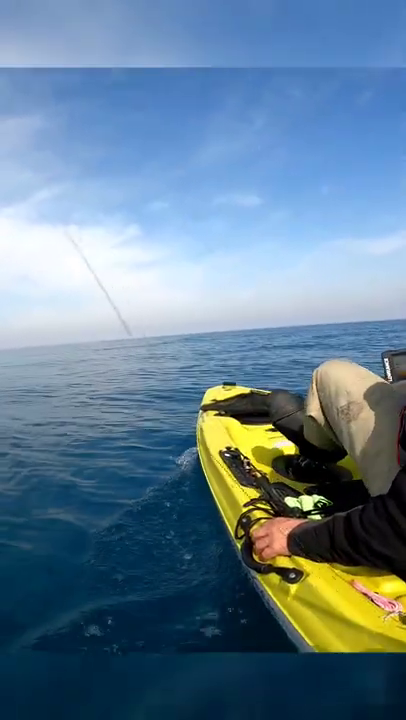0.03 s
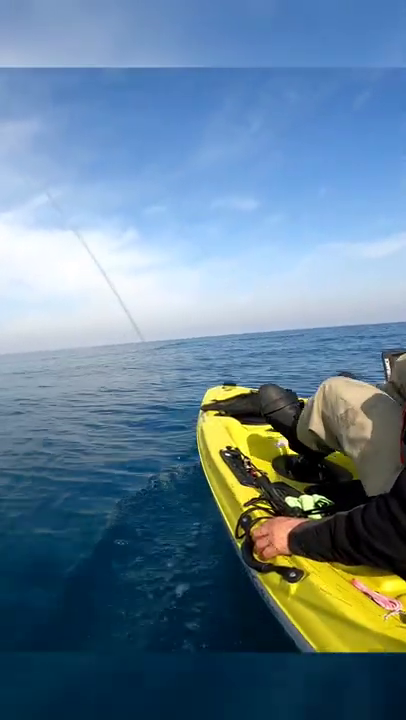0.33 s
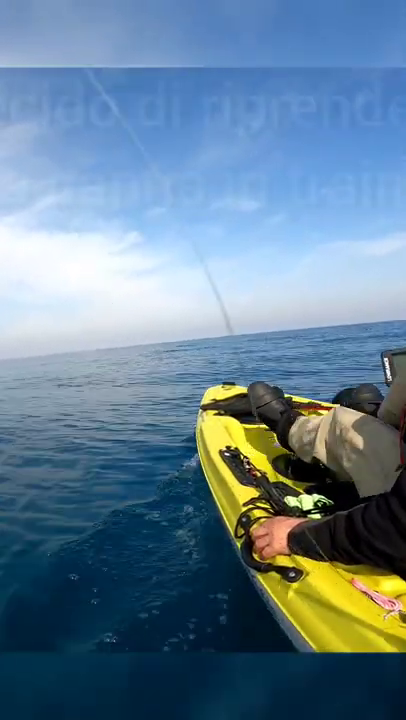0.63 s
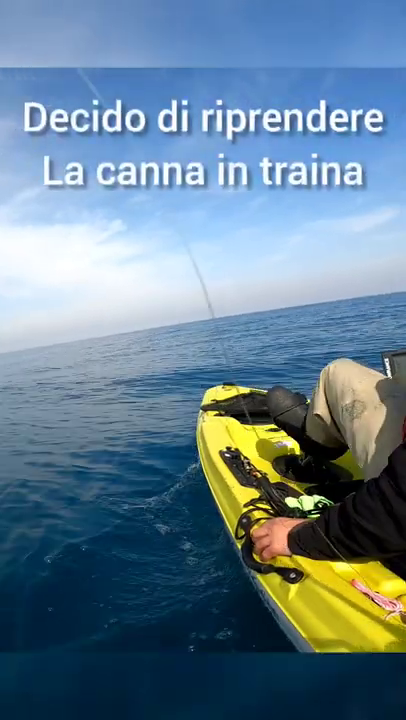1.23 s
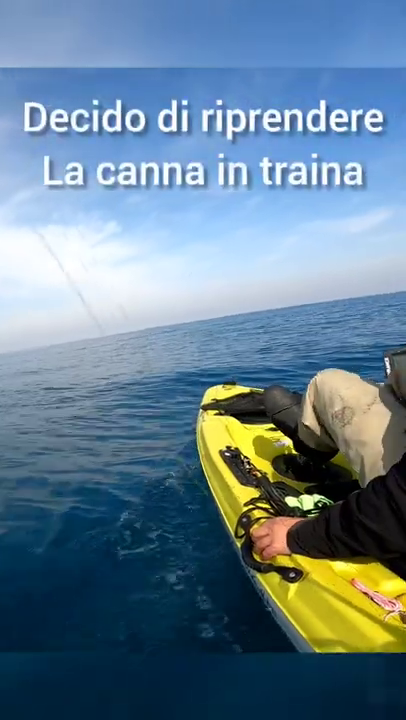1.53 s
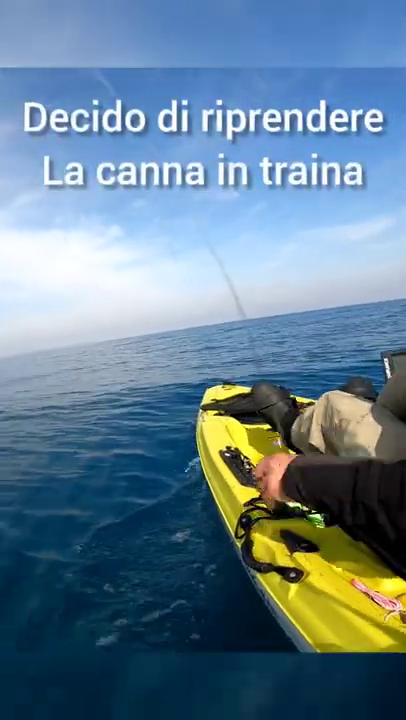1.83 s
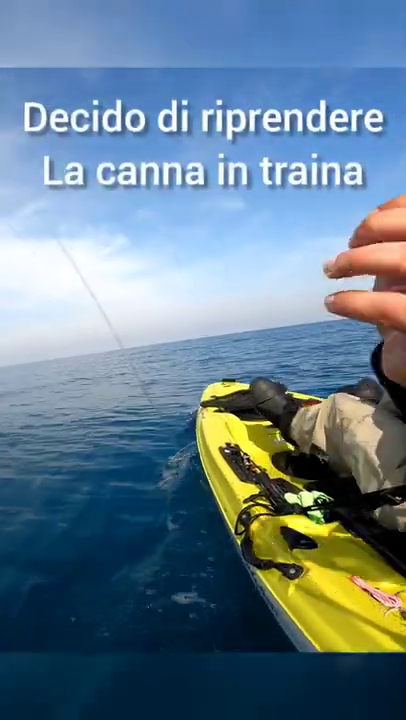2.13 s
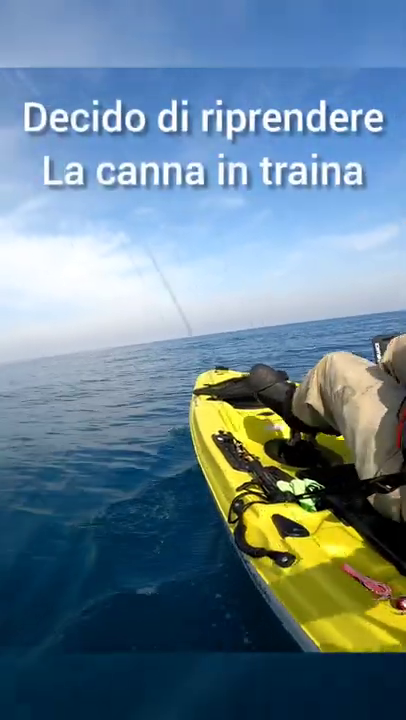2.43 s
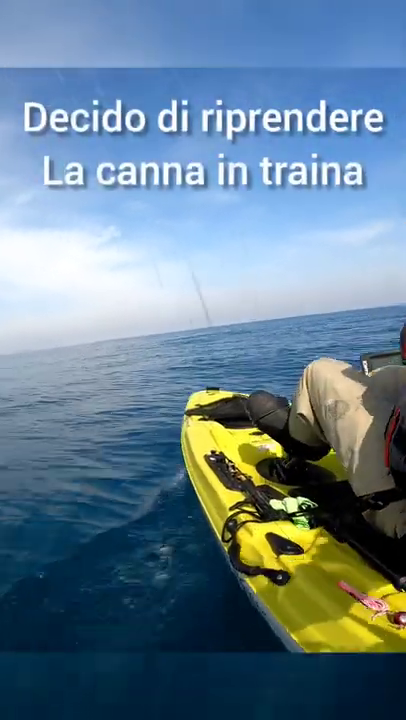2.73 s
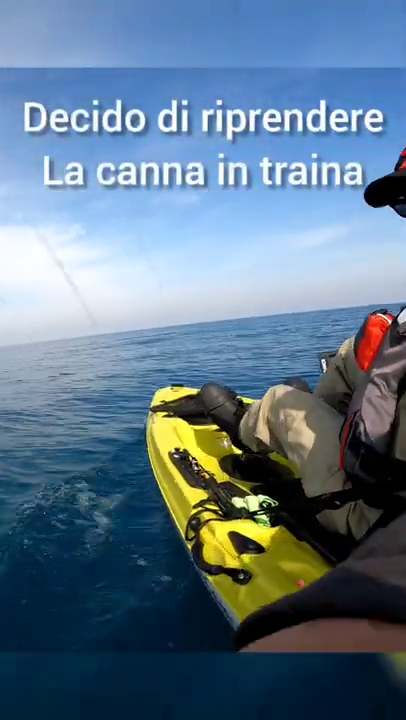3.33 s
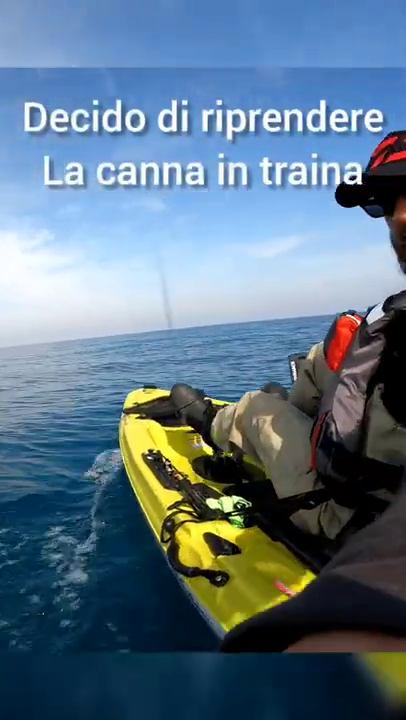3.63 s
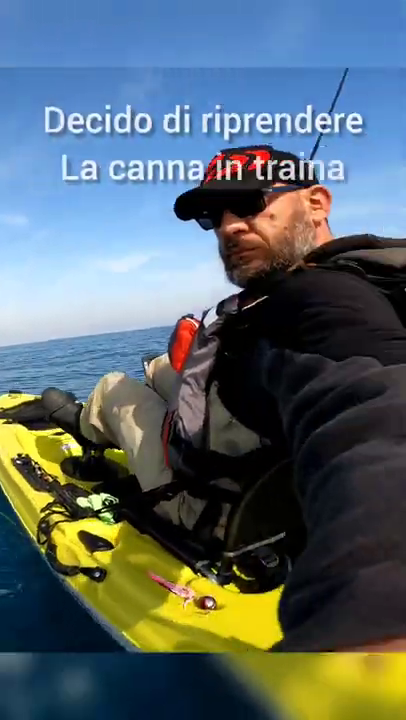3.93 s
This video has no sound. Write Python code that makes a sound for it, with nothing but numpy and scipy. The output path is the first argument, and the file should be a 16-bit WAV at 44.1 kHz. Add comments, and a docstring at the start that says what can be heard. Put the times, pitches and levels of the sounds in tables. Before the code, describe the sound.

Small waves slap and thump a hollow plastic kayak hull while wind rumbles on the microphone.

```python
"""On board a plastic kayak in a low swell. Wavelets slap and thump the hollow hull, trapped air plops and
gurgles, and droplets tick on the deck. Water washes along the side, crests fold into froth, and the bow
wave breaks into clouds of small bubbles and one hiss of spray. Gusts rumble on the microphone over the
faint hiss of the open sea."""
import sys
import numpy as np
from scipy import signal
from scipy.fft import rfft, irfft
from scipy.io import wavfile
from scipy.ndimage import uniform_filter1d

SR = 44100
rng = np.random.default_rng(int(sys.argv[2]) if len(sys.argv) > 2 else 0)


def store_pcm(level_fs):
    """Save levels as 16-bit WAV."""
    pcm = np.round(np.clip(level_fs, -1, 1) * 32767).astype(np.int16)
    wavfile.write(sys.argv[1], SR, np.atleast_2d(pcm).T)


N = 176400

TOP_HZ = 15300
FLICKER_DB = 3.5  # noise in wash and fizz
FROTH_GLIDE, FROTH_SPREAD_DB = 0.43, 6  # bubbles in wash and laps


def undb(db):
    """Decibels to gain."""
    return 10 ** (np.asarray(db) / 20)


def unit(x):
    """Scale to rms 1."""
    return x / np.sqrt(np.mean(x ** 2) + 1e-20)


def seconds(length_s):
    """Time axis."""
    return np.arange(max(int(length_s * SR), 8)) / SR


def fade(t, t60_s):
    """Exponential decay."""
    return np.exp(-np.log(1000) * t / t60_s)


def add(out, start_s, x):
    """Mix x in at start_s."""
    i = int(np.clip(start_s * SR, 0, N - 1))
    out[i:i + len(x)] += x[:N - i]


def curve(rows):
    """Gain through (time [s], level [dB]) points."""
    return undb(np.interp(np.arange(N) / SR, *np.array(rows).T))


def colour(x, points):
    """Filter by (frequency [Hz], gain [dB]) points; rolls off beyond both ends."""
    hz, db = np.array(points).T
    f = np.maximum(np.fft.rfftfreq(len(x), 1 / SR), 1)
    rolloff = np.minimum(np.minimum(f / hz[0], hz[-1] / f), 1) ** 2
    return irfft(rfft(x) * undb(np.interp(np.log(f), np.log(hz), db)) * rolloff, len(x))


def noise(points):
    """Coloured noise, rms 1."""
    return unit(colour(rng.standard_normal(N), points))


def walk(rate_hz):
    """Smooth random motion, rms 1."""
    f = np.fft.rfftfreq(N, 1 / SR)
    return unit(irfft(rfft(rng.standard_normal(N)) / (1 + (f / rate_hz) ** 2) ** 2, N))


def steady(x, span_s):
    """Divide by the running rms to even out slow swells."""
    return x / np.sqrt(np.abs(uniform_filter1d(x ** 2, int(span_s * SR))) + 1e-12)


def bubble(hz, t60_s, glide, wobble=0):
    """Sine that swells at pinch-off, then decays; glide is the relative pitch change per t60."""
    t = seconds(1.2 * t60_s)
    pitch_hz = hz * (1 + glide * t / t60_s + np.resize(wobble, len(t)))
    attack = (1 - np.exp(-t / (0.031 * t60_s))) ** 2
    return np.sin(2 * np.pi * np.cumsum(pitch_hz) / SR) * fade(t, t60_s) * attack


def cloud(per_s, low_hz, high_hz, cycles, glide, spread_db, cap_one_in, slope=1):
    """Bubbles of random size, strength and damping; slope favours the high ones."""
    out = np.zeros(N)
    draws = rng.random((12000, 5))
    for when, pitch, strength, sustain, rise in draws[:int(per_s * N / SR)]:
        hz = min(low_hz * (high_hz / low_hz) ** pitch, TOP_HZ)
        strength_db = spread_db * min(-np.log(1 - strength), np.log(cap_one_in))
        gain = undb(strength_db) * (hz / high_hz) ** slope
        t60_s = cycles * np.exp(2 * sustain - 1) / hz
        add(out, when * N / SR, gain * bubble(hz, t60_s, 2 * glide * rise))
    return out


def sea():
    """Steady hiss of open water."""
    # hiss spectrum (frequency [Hz], gain [dB])
    spectrum = [(1500,-13.5),(4000,-3),(8000,-5.5),(10500,-13),(12300,-17.5),(15000,-22)]
    return undb(-70.5) * noise(spectrum)


def wind():
    """Low turbulence on the microphone; strong gusts reach higher in pitch."""
    # gust strength (time [s], level [dB])
    gusts = [(0.0, -28.5), (0.11, -37), (.49, -35), (.56, -27.5), (.72, -36), (0.91, -31.5), (0.99, -45.5),
             (1.11, -31.5), (1.21, -46), (1.36, -42.5), (1.73, -51.5), (1.84, -41), (1.92, -27.5),
             (2.07, -34.5), (2.16, -26.5), (2.38, -41), (2.6, -31.5), (2.72, -52.5), (2.88, -31.5),
             (3.12, -46.5), (3.51, -23.5), (3.59, -36), (3.7, -24.5), (3.78, -31.5), (3.84, -22.5),
             (4.0, -39)]
    # turbulence spectrum (frequency [Hz], gain [dB])
    spectrum = [(15,-5),(28,4),(45,2),(68,1.5),(100,0),(160,-8),(250,-19),(400,-37),(900,-91)]
    split_hz, strong_db, flutter_db = 63, -36, 2
    air = steady(noise(spectrum), span_s=0.083)
    gust = curve(gusts)
    deep = signal.sosfiltfilt(signal.butter(2, split_hz, fs=SR, output="sos"), air)
    brightness = np.minimum(gust / undb(strong_db), 1) ** 0.24
    return (deep + brightness * (air - deep)) * gust * undb(-0.5 + flutter_db * walk(8.7))


def wash():
    """Larger bubbles churn along the hull over flickering noise."""
    # wash envelope (time [s], level [dB])
    levels = [(0.0, -48.5), (0.05, -51), (0.34, -45.5), (0.47, -50), (1.64, -45), (1.89, -52.5),
              (2.26, -45), (2.7, -56), (2.81, -37.5), (2.88, -51.5), (3.09, -40), (3.55, -51), (3.8, -48.5),
              (3.82, -39), (4.0, -44)]
    # wash spectrum (frequency [Hz], gain [dB])
    spectrum = [(120,9.5),(250,4.5),(450,4),(800,1.5),(1300,0.5),(1900,-5.5),(2800,-15.5),(5000,-20)]
    bubbles = cloud(per_s=700, low_hz=283.6, high_hz=2522, cycles=19.7,
                    glide=FROTH_GLIDE, spread_db=FROTH_SPREAD_DB, cap_one_in=34)
    bubbles = steady(colour(bubbles, spectrum), span_s=0.035)
    rush = undb(-4.5 + FLICKER_DB * walk(52)) * noise(spectrum)
    return curve(levels) * (undb(-5) * bubbles + rush)


def fizz():
    """Tiny bubbles burst in the bow wave over a soft hiss."""
    # fizz envelope (time [s], level [dB])
    levels = [(0.0, -55.5), (0.04, -60.5), (0.34, -49.5), (0.4, -61), (0.85, -58), (0.92, -46.5),
              (0.96, -55), (1.2, -49), (1.22, -54.5), (1.4, -54), (1.55, -58), (1.79, -62), (2.0, -63),
              (2.04, -52.5), (2.27, -51.5), (2.34, -55.5), (2.77, -57.5), (2.8, -48), (2.87, -58.5),
              (3.09, -41), (3.12, -46.5), (3.48, -62), (3.85, -48), (4.0, -49.5)]
    # fizz spectrum (frequency [Hz], gain [dB])
    spectrum = [(700,8.5),(1500,4),(2200,3.5),(3800,1.5),(5000,-4),(6300,-12.5),(8000,-16),(10500,-35.5),(12500,-22.5),(15500,-52)]
    bubbles = cloud(per_s=2200, low_hz=1525, high_hz=14560, cycles=14.7,
                    glide=0.032, spread_db=4.2, cap_one_in=39)
    bubbles = steady(colour(bubbles, spectrum), span_s=1.0)
    hiss = undb(-2 + FLICKER_DB * walk(66)) * noise(spectrum)
    return curve(levels) * (undb(-1) * bubbles + hiss)


def plops():
    """Loud single bubbles; the pitch wobbles as they change shape."""
    # air pockets closing (time [s], peak [dB], pitch [Hz], t60 [s], glide [share of pitch per t60])
    pockets = [(.023,-38.5,1380,0.022,0.065),(.268,-39,810,0.04,0.19),(.393,-32.5,630,0.024,0.21),(.595,-31,637,0.022,0.091),
               (.691,-35,1047,0.052,-0.027),(1.043,-27.5,2270,0.02,0.017),(1.042,-38,734,0.045,0.54),
               (1.173,-36.5,868,0.071,0.02),(1.228,-34.5,913,0.047,0.14),(1.545,-40,1650,0.034,0.4),(1.588,-35,442,0.11,0.25),
               (1.669,-38,917,0.045,0.27),(1.673,-40,1640,0.028,0.045),(2.066,-44.5,2330,0.044,-0.11),(2.192,-36,1430,0.035,0.3),
               (2.248,-33,630,0.045,0.38),(2.274,-31,1980,0.0083,0.28),(2.316,-31.5,635,0.041,-0.044),(2.409,-34,900,0.064,0.52),(2.471,-40.5,1070,.04,.15),(2.555,-40.5,1117,0.067,-0.065),
               (2.572,-40,752,0.12,0.078),(2.789,-25.5,1840,0.025,0.02),(2.795,-21.5,172.7,0.16,-0.035),(2.836,-33.5,1590,0.037,0.32),
               (2.849,-42,6960,0.011,-0.058),(3.243,-34.5,1470,0.025,-0.017),
               (3.288,-32,700,0.074,0.3),(3.843,-33.5,683,0.046,0.014),(3.881,-35,764,0.068,0.032),(3.901,-24,1570,0.007,0.29),(3.909,-23,1210,0.014,0.29)]
    out = np.zeros(N)
    wobble = 0.076 * walk(rate_hz=580)
    for start_s, db, hz, t60_s, glide in pockets:
        ring = bubble(hz, t60_s, glide, wobble[int(start_s * SR):])
        add(out, start_s, undb(db) * ring / np.abs(ring).max())
    return out


def hull():
    """Soft pushes ring the hollow shell; a longer push sounds duller."""
    # blows on the hull (time [s], peak [dB], push length [s])
    thumps = [(0.036,-18,0.0047),(0.052,-23.5,0.0048),(0.527,-21,0.0079),(0.55,-24.5,0.0048),(.764,-23,0.0077),(.819,-30,0.003),(0.887,-24.5,0.014),(1.104,-27,0.0064),(1.307,-29,0.0032),(1.321,-25,0.0037),
              (1.789,-27,0.014),(1.924,-21.5,0.0043),(2.144,-24.5,0.01),(2.794,-17.5,0.0022),(2.836,-21,0.0036),(3.479,-14,0.0081),(3.497,-22,0.0078),(3.678,-18,0.012),(3.821,-10,0.0033),(3.833,-13,0.0047)]
    # shell modes (frequency [Hz], gain [dB], t60 [s])
    modes = [(68,-3.5,0.055),(123.8,-7.5,0.18),(177.2,3.5,0.064),(202,6,0.023),(261,1,0.029),(358,-3.5,0.13),(410,-24,0.087)]
    out, t = np.zeros(N), seconds(0.3)
    tunings = 1 + 0.015 * rng.standard_normal((len(thumps), len(modes)))
    for (start_s, db, push_s), tuning in zip(thumps, tunings):
        ring = sum(undb(mode_db) * np.cos(2 * np.pi * hz * ratio * t) * fade(t, t60_s)
                   for (hz, mode_db, t60_s), ratio in zip(modes, tuning))
        push = np.sin(np.pi * seconds(push_s) / push_s) ** 2
        thump = signal.fftconvolve(ring, push)
        add(out, start_s, undb(db) * thump / np.abs(thump).max())
    return out


def laps():
    """Crests fold over beside the hull into a dense froth of mid-sized bubbles."""
    # folding crests (centre [s], half width [s], level [dB])
    crests = [(.305, 0.03, -49), (2.23, 0.077, -47), (3.07, 0.073, -40.5)]
    t = np.arange(N) / SR
    swell = sum(undb(db) * np.exp(-((t - centre_s) / half_s) ** 2) for centre_s, half_s, db in crests)
    froth = cloud(per_s=1000, low_hz=564.5, high_hz=4024, cycles=25.4,
                  glide=FROTH_GLIDE, spread_db=FROTH_SPREAD_DB, cap_one_in=30, slope=0.1)
    return swell * steady(froth, span_s=0.035)


def ticks():
    """Droplets strike the deck with a brief, ragged ring."""
    # droplet impacts (time [s], peak [dB], pitch [Hz])
    droplets = [(0.299,-33.5,2500),(0.345,-41,2500),(0.921,-31,3450),(1.181,-32,3100),(1.202,-34.5,4100),(2.194,-36,4000),(2.257,-32,2970),(2.294,-37,4230),
                (2.849,-34,2680),(2.926,-35.5,4050),(3.173,-36.5,6600),(3.818,-33,3960)]
    t60_s, relative_width = 0.012, 0.33
    out, t = np.zeros(N), seconds(t60_s)
    for (start_s, db, hz), grain in zip(droplets, rng.standard_normal((len(droplets), SR // 10))):
        burst = grain[:len(t)] * fade(t, t60_s)
        b, a = signal.iirpeak(hz, 1 / relative_width, fs=SR)
        tick = signal.lfilter(b, a, signal.lfilter(b, a, burst))
        add(out, start_s, undb(db) * tick / np.abs(tick).max())
    return out


def slaps():
    """Short splashes that build as a wavelet folds against the side."""
    # wavelet impacts (time [s], relative level [dB], t60 [s])
    wavelets = [(0.347,-30,0.052),(1.037,-29,0.05),(1.3,-34.5,0.044),(1.581,-32.5,0.079),(2.058,-38.5,0.12),
                (2.737,-34.5,0.12),(2.788,-25.5,0.076),(3.002,-34,0.15),(3.063,-29,0.13),(3.811,-36,0.099)]
    # splash spectrum (frequency [Hz], gain [dB])
    spectrum = [(150,4),(420,7),(750,-2),(1200,-2.5),(2000,-9.5),(4000,-17.5),(8000,-29),(15000,-67)]
    envelope = np.zeros(N)
    for start_s, db, t60_s in wavelets:
        t = seconds(t60_s)
        attack = 1 - np.exp(-t / (0.07 * t60_s))
        add(envelope, start_s, undb(db + 4.5) * fade(t, t60_s) * attack)
    return envelope * noise(spectrum)


def gurgles():
    """Water climbs the hull and rings shrinking cavities, each in one ragged upward sweep."""
    # air cavities (time [s], length [s], level [dB], start pitch [Hz], end pitch [Hz])
    cavities = [(0.58,.07,-48.5,595,985),(0.745,0.12,-43.5,156.4,326),(1.591,0.092,-49,479,890),(2.186,0.093,-47,428,690),(2.736,0.0464,-47,480,622),(3.111,.06,-40,805,1150),(3.272,0.049,-46,985,1700)]
    relative_width, sputter = 0.19, 0.7  # sputter: 0 even, 1 fully ragged
    out = np.zeros(N)
    for start_s, length_s, db, from_hz, to_hz in cavities:
        progress = seconds(length_s) / length_s
        phase = 2 * np.pi * np.cumsum(from_hz * (to_hz / from_hz) ** progress) / SR
        churn = walk(relative_width * from_hz) + 1j * walk(relative_width * from_hz)
        churn /= (np.abs(churn) + 1e-9) ** (1 - sputter)
        ring = (churn[:len(phase)] * np.exp(1j * phase)).imag
        arch = np.abs(np.sin(np.pi * progress)) ** 0.5
        add(out, start_s, undb(db) * unit(ring * arch))
    return out


def spray():
    """One sheet of spray: a fluttering hiss that swells and sinks."""
    # spray spectrum (frequency [Hz], gain [dB])
    spectrum = [(120,14.5),(230,12),(450,1.5),(1200,-1.5),(4000,-4.5),(7000,-14),(10000,-21.5),(13000,-27),(15500,-36)]
    # sheet of spray (start [s], end [s], level [dB])
    sheet = (1.292, 1.581, -40)
    start_s, end_s, db = sheet
    rise_s, fall_s, flutter_db = 0.06, 0.13, 1.2
    t = np.arange(N) / SR
    envelope = np.clip(np.minimum((t - start_s) / rise_s, (end_s - t) / fall_s), 0, 1)
    return undb(db + flutter_db * walk(66)) * envelope * noise(spectrum)


def scene():
    """Wind, water and hull at one microphone."""
    mix = (sea() + wind() + hull() + spray() + slaps() + wash() + laps() + fizz()
           + plops() + ticks() + gurgles())
    return mix[None]


def record(dry):
    """Steep low-pass; cuts the top treble."""
    return signal.sosfilt(signal.ellip(8, 0.2, 80, TOP_HZ, fs=SR, output="sos"), dry)


dry = scene()
out = record(dry)
store_pcm(out)
```